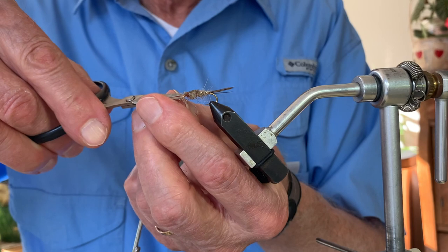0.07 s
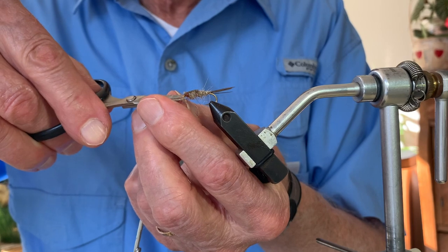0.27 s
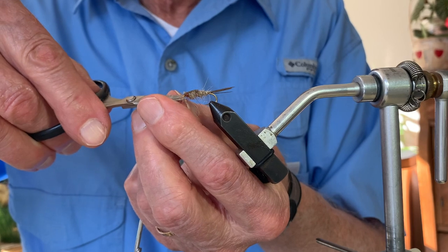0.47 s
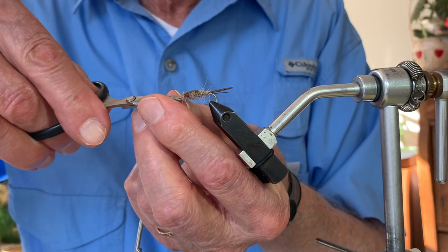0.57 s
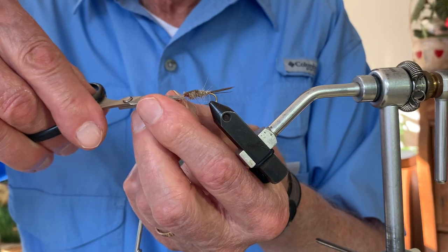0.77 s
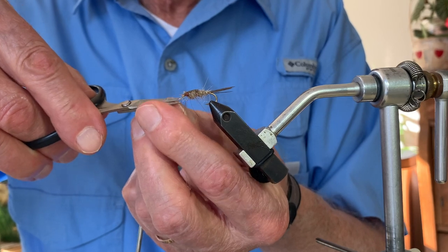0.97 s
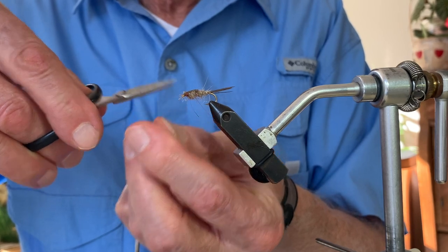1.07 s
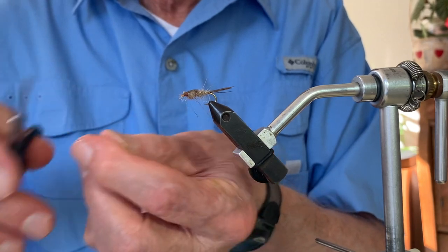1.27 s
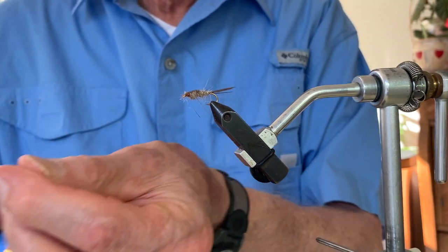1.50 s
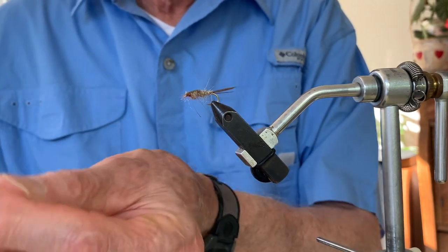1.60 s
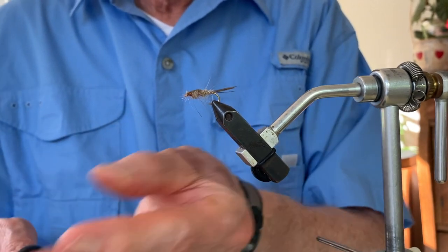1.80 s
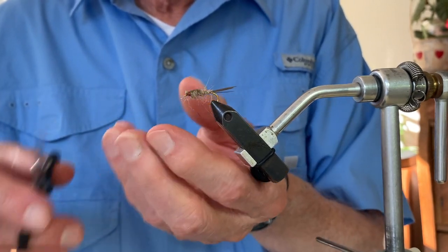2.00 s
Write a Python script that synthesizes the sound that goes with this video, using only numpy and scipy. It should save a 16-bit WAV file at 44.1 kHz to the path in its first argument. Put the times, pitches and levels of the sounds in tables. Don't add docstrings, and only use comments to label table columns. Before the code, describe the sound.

Small steel scissors make one crisp snip, then after a pause touch a wooden desk, drop with a bright loud clack and bounce, close to a phone's stereo microphones in a quiet room with low ventilation rumble.

```python
import sys
import numpy as np
from scipy import signal
from scipy.fft import rfft, irfft
from scipy.io import wavfile
from scipy.ndimage import uniform_filter1d

SR = 44100
rng = np.random.default_rng(int(sys.argv[2]) if len(sys.argv) > 2 else 0)


def makeup_ratio(level_db):
    decades = np.asarray(level_db, float) / 20
    return 10 ** decades


def to_wav(s):
    ch = np.atleast_2d(s).T
    pcm = np.round(np.clip(ch, -1, 1) * 32767)
    wavfile.write(sys.argv[1], SR, pcm.astype(np.int16))


N = 90316
T = np.arange(N) / SR
HZ = np.arange(N // 2 + 1) * SR / N + 1e-3
BASS_LEAD_S = 12 / 44100


def table(rows, hz=HZ):
    rows = np.array(rows, float)
    return np.interp(np.log(hz), np.log(rows[:, 0]), rows[:, 1])


def over_time(times, values):
    return np.interp(T, times, values)


def unit(x):
    return x / np.sqrt(np.mean(x ** 2))


def band(x, hz, width):
    return signal.lfilter(*signal.iirpeak(hz, hz / max(width, 1), fs=SR), x)


def hum_band(hz, width):
    return unit(band(band(pair(), hz, width), hz, 2 * width))


def high_pass(x, hz):
    return signal.sosfilt(signal.butter(2, hz, "high", fs=SR, output="sos"), x)


def ring(at, hz, t60):
    u = np.maximum(T - at, 0)
    return np.sin(2 * np.pi * hz * u) * np.exp(-np.log(1000) * u / t60)


def walk(rate):
    k = int(SR / rate)
    steps = np.repeat(rng.standard_normal(N // k + 1), k)
    return unit(uniform_filter1d(uniform_filter1d(steps, k), k)[:N])


def later(x, s):
    return irfft(rfft(x) * np.exp(-2j * np.pi * HZ * s), N)


def pair():
    like = 1 / (1 + (HZ / 420) ** 2)
    mid, side = rfft(rng.standard_normal((2, N))) * np.sqrt(np.array([1 + like, 1 - like]) / 2)
    return irfft(np.array([mid + side, (mid - side) * np.exp(-2j * np.pi * HZ * BASS_LEAD_S)]), N)


def steel(contacts, modes):
    size = 8192
    dry, send = np.zeros((2, N + size))
    t, hz = T[:size], np.arange(size // 2 + 1) * SR / size + 1e-3
    for at, db, ms, send_db, tilt_db in contacts:
        u, i = t / (ms / 1000), int(at * SR)
        burst = 0.12 * u * np.exp(1 - 2 * u) * rng.standard_normal(size)
        burst[int(ms / 4000 * SR)] += 1
        hit = makeup_ratio(-18) * band(burst, 8300, 15000)
        for k, (f, width, gain_db) in enumerate(modes):
            mode = band(band(burst, f, width), f, 2 * width) * np.sqrt(1000 / width)
            hit = hit + (-1) ** k * makeup_ratio(gain_db) * mode
        hit = high_pass(hit, 1300)
        hit = hit * makeup_ratio(db) / np.abs(hit).max()
        blurred = hit * np.exp(-np.maximum(t - ms / 2000, 0) * np.pi * 350)
        tilt = makeup_ratio(send_db + tilt_db * np.log2(hz / 5000)) / (1 + (1240 / hz) ** 4)
        dry[i:i + size] += hit
        send[i:i + size] += irfft(rfft(blurred) * tilt)
    return np.array([dry[:N], send[:N]])


# f/Hz, width/Hz, level/dB
SNIP_MODES = [(2740, 1200, -13.5), (4480, 540, -5.5), (6600, 730, -24.5), (8700, 970, 0.5),
              (10630, 610, -4), (13040, 870, 6.5), (15300, 900, -2.5), (15700, 900, -11.5)]
TIP_MODES = [(1650, 700, -5), (2280, 830, 1), (4460, 880, -8), (6500, 770, -7.5), (12000, 900, 1.5),
             (14270, 1200, -10.5)]
# t/s, level/dB, contact/ms, room send/dB, send tilt/(dB per octave)
SNIP_CONTACTS = [
    (.6015, -53.5, 1.5, -26, -9),
    (.6313, -21.5, 0.61, -4.5, -7),
    (.6321, -31, 0.4, -13, -15),
    (.7806, -39, 1.1, 1, -8),
]
TIP_CONTACTS = [
    (.6357, -33.5, 0.91, -8.5, -1),
    (.6395, -53, 0.2, -15, 0),
    (.648, -36, 0.27, -26, -0.4),
    (.654, -57, 0.65, -21, 0),
    (.7822, -49, 0.71, -5, -2),
]


def snip():
    return steel(SNIP_CONTACTS, SNIP_MODES) + steel(TIP_CONTACTS, TIP_MODES)


# f/Hz, width/Hz, level/dB
TOUCH_MODES = [(3000, 490, -10), (3496, 600, -7), (4100, 670, -6.5), (7200, 600, 0.5), (9000, 1600, -9),
               (10080, 710, -4.5), (14800, 1800, -8.5), (1704, 41, -36.5)]
SETTLE_MODES = [(2810, 900, -11), (3900, 800, -2), (5000, 700, -10), (6970, 550, 2.5), (9960, 1000, -11.5),
                (14800, 1600, -15)]
# t/s, level/dB, contact/ms, room send/dB, send tilt/(dB per octave)
TOUCH_CONTACTS = [
    (1.6138, -22, .5, -2, -7),
]
SETTLE_CONTACTS = [
    (1.630, -48, 0.88, 2, -2),
    (1.6428, -42, 1.3, 2, -3.5),
    (1.6742, -45, 1.7, 3, -4),
    (1.6815, -46, 1.4, 3, -0.5),
]


def touch():
    return steel(TOUCH_CONTACTS, TOUCH_MODES) + steel(SETTLE_CONTACTS, SETTLE_MODES)


# f/Hz, width/Hz, level/dB
DROP_MODES = [(7310, 540, -12), (7920, 480, 1), (9270, 610, -13), (10610, 250, -5.5), (11630, 660, 3),
              (12760, 700, -9), (14200, 800, -7.5), (15600, 400, -20)]
CLANK_MODES = [(2280, 180, -11.5), (3430, 540, -8.5), (4230, 670, -9.5), (4853, 230, 1.5),
               (6030, 570, -14.5)]
# t/s, level/dB, contact/ms, room send/dB, send tilt/(dB per octave)
DROP_CONTACTS = [
    (1.7270, -6, 0.46, -1.1, -9),
]
CLANK_CONTACTS = [
    (1.7277, -14.5, 0.6, -5, 0),
    (1.7295, -20.5, 0.45, 0.5, 0.0025),
]


def drop():
    return steel(DROP_CONTACTS, DROP_MODES) + steel(CLANK_CONTACTS, CLANK_MODES)


# f/Hz, width/Hz, level/dB
BOUNCE_MODES = [(6140, 700, -33), (6940, 700, -15.5), (9000, 1000, -8.5), (10570, 700, 2.5),
                (11900, 600, -3), (14800, 600, -12.5), (15500, 600, -18.5)]
HANDLE_MODES = [(2000, 300, 2), (2535, 410, 1.5), (3500, 650, 0), (3990, 730, -2), (5000, 370, -13.5),
                (6100, 600, -14)]
# t/s, level/dB, contact/ms, room send/dB, send tilt/(dB per octave)
BOUNCE_CONTACTS = [
    (1.8236, -16.5, 0.24, -5.5, -7),
    (1.841, -52.5, .5, 0.5, 2),
]
HANDLE_CONTACTS = [
    (1.8243, -25.5, .6, 2.5, 1),
    (1.8258, -37.5, 0.75, 1.5, -3),
    (0.48, -57, 0.9, -15, 2),
]


def bounce():
    return steel(BOUNCE_CONTACTS, BOUNCE_MODES) + steel(HANDLE_CONTACTS, HANDLE_MODES)


def rattle(rows, power):
    noise, out = pair() * makeup_ratio(0.5 * walk(120)), 0
    for at, hz, width, db, t60 in rows:
        u = np.maximum(T - at, 0)
        fade = np.exp(-np.log(1000) * (u / t60) ** power) * np.minimum(u / 0.0036, 1)
        out = out + makeup_ratio(db) * fade * unit(band(band(noise, hz, width), hz, width))
    return out


# t/s, f/Hz, width/Hz, level/dB, time to fall 60 dB/s
BUZZ_BANDS = [(.783, 2100, 400, -78, .2), (1.617, 1719, 50.3, -55.5, 0.59), (1.616, 3020, 1500, -57, 0.36),
              (1.617, 5000, 915, -56, .3), (1.672, 3740, 2000, -57.5, 0.18),
              (1.732, 5093, 303, -45.5, 0.36), (1.736, 5960, 221.4, -49, 0.36),
              (1.734, 2425, 200, -53, 0.28), (1.734, 7900, 413, -62.5, 0.63),
              (1.734, 3670, 500, -64.5, 0.36), (1.734, 10500, 488, -55.5, 0.31),
              (1.827, 2600, 500, -51, 0.17)]


def buzz():
    return rattle(BUZZ_BANDS, 0.93)


# t/s, f/Hz, width/Hz, level/dB, time to fall 60 dB/s
RASP_BANDS = [
    (.634, 14400, 1600, -59.5, 0.13),
    (.634, 11400, 2500, -73, 0.26),
    (.634, 4800, 2520, -69.5, 0.22),
    (.637, 2170, 900, -60.5, 0.06),
]


def rasp():
    return rattle(RASP_BANDS, 2)


# f/Hz, level struck at the edge/dB, level struck mid-top/dB, time to fall 60 dB/s
DESK_MODES = [(110.7, -14, -8.5, 0.2), (178.6, -15.5, -18.5, 0.85), (246, -9, -2, 0.064),
              (303, -15.5, 3.5, 0.032), (327, -7, -11, 0.044), (426, -5, -29, 0.037),
              (618, 3.5, -18, 0.012), (800, -19, -14, 0.06), (1040, -17.5, -37.5, 0.038),
              (2280, -48, -26.5, 0.017)]
# t/s, level/dB, push/ms (softer is longer and duller), share mid-top/0-1
DESK_BLOWS = [
    (1.185, -45, 1.1, 0.4),
    (1.415, -43.5, 1.1, 0.9),
    (1.616, -25.5, 0.17, 0.11),
    (1.7288, -22.5, 0.87, 0.93),
    (1.826, -30, 0.5, 0.96),
]


def desk():
    out = np.zeros(N)
    for at, db, ms, mid in DESK_BLOWS:
        push = np.sin(np.pi * np.clip(T[:441] / (ms / 1000), 0, 1))
        hit = 0
        for f, edge_db, mid_db, t60 in DESK_MODES:
            hit = hit + makeup_ratio(edge_db + mid * (mid_db - edge_db)) * ring(at, f, t60)
        hit = signal.fftconvolve(hit, push)[:N]
        out = out + hit * makeup_ratio(db) / np.abs(hit).max()
    return high_pass(out, 100)


# t/s, level/dB
SLEEVE_LEVEL = [(1.12, -100), (1.25, -83), (1.38, -78), (1.5, -75), (1.6, -80), (1.75, -66), (1.95, -100)]
# f/Hz, width/Hz, level/dB
CLOTH_BANDS = [(752, 390, 5), (1190, 580, 2), (1670, 340, -1), (2600, 1200, -6.5), (4100, 1100, -3.5),
               (9300, 6300, -0.5), (14420, 1700, -8.5)]


def sleeve():
    cloth = sum(makeup_ratio(db + 1.7 * walk(25.4)) * hum_band(f, width) for f, width, db in CLOTH_BANDS)
    return cloth * makeup_ratio(over_time(*np.array(SLEEVE_LEVEL).T))


def scrape():
    u = T - 1.7265
    swell = np.exp(np.minimum(u, 0) / 0.012) * (u < 0) * makeup_ratio(-58)
    return swell * unit(band(band(pair(), 5300, 1100), 5300, 1100))


# f/Hz, width/Hz, level/dB
SWISH_BANDS = [(1170, 250, -71.5), (1750, 100, -83), (2383, 82, -84.5), (4930, 3500, -74.5)]
# t/s, f/Hz, level/dB, time to fall 60 dB/s
MOTOR_PIPS = [
    (0.339, 1854, -58.5, 0.09),
    (0.913, 1870, -60, 0.096),
    (.911, 2900, -68.5, 0.047),
    (.078, 4500, -70, 0.035),
    (0.57, 4500, -71, 0.042),
]


def fan():
    turn_s, first_turn_s, rise_s, fall_s = 0.44, 0.14, 0.026, 0.036
    u = (T - first_turn_s + turn_s / 2) % turn_s - turn_s / 2
    shape = np.where(u < 0, np.exp(-(u / rise_s) ** 2), np.exp(-u / fall_s))
    swish = shape * sum(makeup_ratio(db) * hum_band(f, width) for f, width, db in SWISH_BANDS)
    pips = 0
    for at, f, db, t60 in MOTOR_PIPS:
        pips = pips + makeup_ratio(db) * ring(at, f, t60) * np.clip((T - at) / 0.0017, 0, 1)
    return swish + pips * np.array([[1], [-.3]])


# t/s, f/Hz, level/dB
LOW_DRONE = [(0.0, 74.95, -56.5), (0.11, 78.16, -53), (0.209, 76.2, -49.5), (0.23, 78.6, -66.5),
             (0.272, 74.7, -51.5), (0.57, 75.61, -55.5), (0.69, 72.58, -60), (0.83, 77.07, -52),
             (1.32, 75.49, -55.5), (1.34, 78.7, -92), (1.36, 76.5, -55.5), (1.79, 76.67, -52),
             (1.791, 73.45, -53.5), (1.969, 75.57, -43.5), (2.05, 76.7, -45.5)]
# t/s, level/dB
SECOND_LEVEL = [(0, -71), (0.849, -68.5), (0.999, -58.5), (1.3, -63), (1.45, -58), (1.7, -65), (2.05, -66)]


def motor():
    s, hz, db = np.array(LOW_DRONE).T
    pitch = over_time(s, hz)
    turns = np.cumsum(pitch) / SR - np.outer([0, BASS_LEAD_S], pitch)
    drone = np.sqrt(2) * makeup_ratio(over_time(s, db)) * np.sin(2 * np.pi * turns)
    second = unit(band(band(pair(), 177.8, 6), 177.8, 6.3))
    second = second * makeup_ratio(over_time(*np.array(SECOND_LEVEL).T))
    return drone * makeup_ratio(np.array([[-.4], [.4]])) + second


# f/Hz, level/dB
AIR_COLOUR = [(25, -16), (45, 1.5), (100, 0), (220, -2.5), (420, -5.5), (750, -29), (2500, -41.5),
              (16000, -45)]
# f/Hz, width/Hz, level/dB
ROOM_MODES = [(74.1, 11, -61.5), (106.5, 11, -59), (192.6, 22, -69), (411.1, 16, -73.5),
              (528.4, 4.4, -77.5), (1175, 5.4, -90)]


def air():
    bed = unit(irfft(rfft(pair()) * makeup_ratio(table(AIR_COLOUR)), N)) * makeup_ratio(-57.5 + 0.46 * walk(5.4))
    return bed + sum(makeup_ratio(db) * hum_band(f, width) for f, width, db in ROOM_MODES)


# f/Hz, time to fall 60 dB/s
ROOM_T60 = [(100, 0.53), (400, 0.32), (1500, 0.33), (5000, 0.25), (15000, 0.31)]


def room(x):
    noise, tail = rfft(pair()), 0
    for hz in 62.5 * 2. ** np.arange(9):
        octave = np.cos(np.pi / 2 * np.clip(np.log2(HZ / hz), -1, 1)) ** 2
        part = irfft(noise * octave, N)
        tail = tail + part * np.exp(-np.log(1000) * T / table(ROOM_T60, hz))
    tail = tail * (1 - np.exp(-(T / 0.002) ** 2)) * makeup_ratio(-15) / 10
    return signal.fftconvolve(tail, x[None])[:, :N]


# f/Hz, lag/half turns
TREBLE_LAG = [(7000, 4.3), (8200, 5), (9350, 5), (10200, 6), (11900, 6), (13000, 7), (14100, 7), (15000, 8)]


def tie(x):
    ramp = x[:, :1] + (x[:, -1:] - x[:, :1]) * T / T[-1]
    left, right = rfft(x - ramp)
    turned = right * np.exp(-1j * np.pi * np.interp(HZ, *np.array(TREBLE_LAG).T))
    mix = np.pi / 2 * np.clip((HZ - 7300) / 500 + .5, 0, 1)
    left = np.sin(mix) * turned + np.cos(mix) * left
    return ramp + irfft(np.array([left, right]) * (HZ < 15800), N)


# f/Hz, lag/half turns
CLICK_LAG = [(0, 0), (1100, -.35), (1900, -1), (3400, -1.5), (4900, -1.7), (5700, -2.1), (7200, -1.55),
             (8400, -1), (11000, 0), (13450, 1), (18500, 3)]


def scene():
    clicks, send = snip() + touch() + drop() + bounce()
    lag = np.interp(HZ, *np.array(CLICK_LAG).T)
    left_clicks = irfft(rfft(clicks) * np.exp(-1j * np.pi * lag), N)
    wood = desk()
    thump = np.array([wood * makeup_ratio(6.0), later(wood, BASS_LEAD_S) * makeup_ratio(2.5)])
    diffuse = room(send + wood * makeup_ratio(8)) + buzz() + rasp()
    diffuse = diffuse + sleeve() + scrape() + fan() + motor() + air()
    return np.array([left_clicks, clicks]) + thump + tie(diffuse)


def low_pass(x):
    return signal.sosfilt(signal.butter(12, 17110, fs=SR, output="sos"), x)


def record(dry):
    cut = signal.sosfilt(signal.ellip(8, .2, 70, 16300, fs=SR, output="sos"), dry)
    mix = cut * np.clip((T[-1] - T) / 0.004, 0, 1)
    return low_pass(mix)


dry = scene()
out = record(dry)
to_wav(out)
```